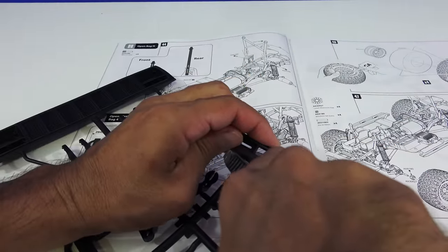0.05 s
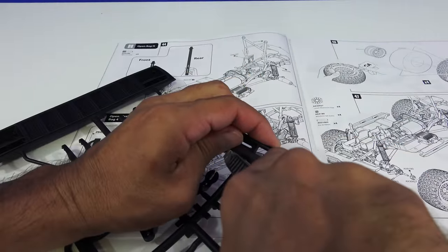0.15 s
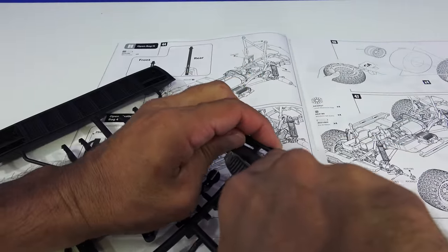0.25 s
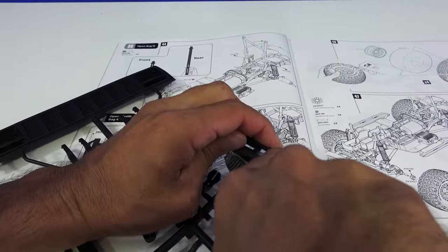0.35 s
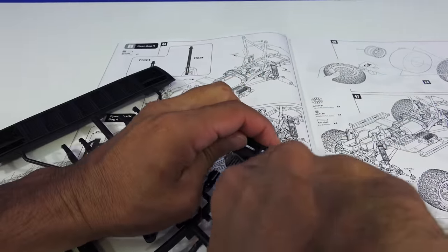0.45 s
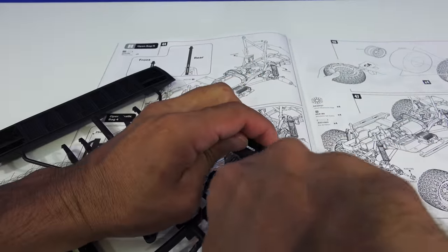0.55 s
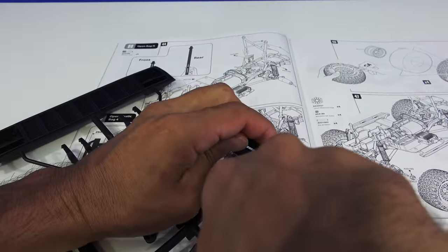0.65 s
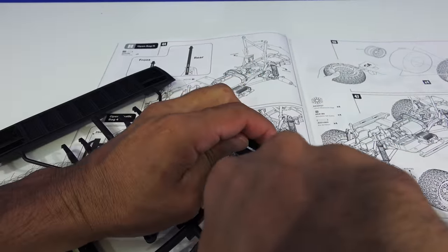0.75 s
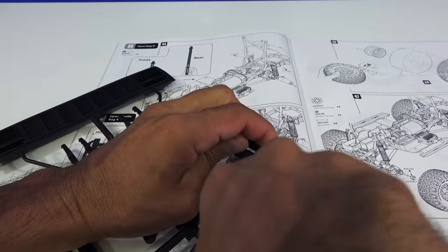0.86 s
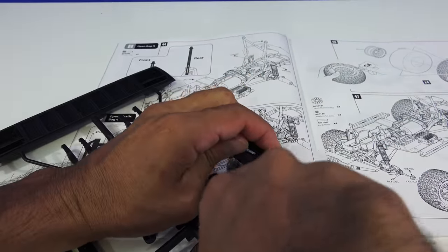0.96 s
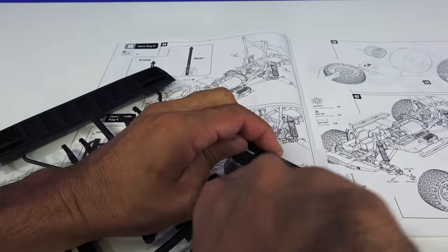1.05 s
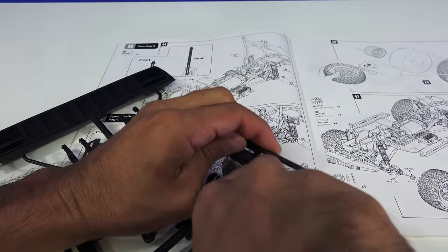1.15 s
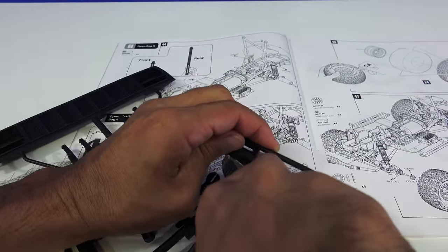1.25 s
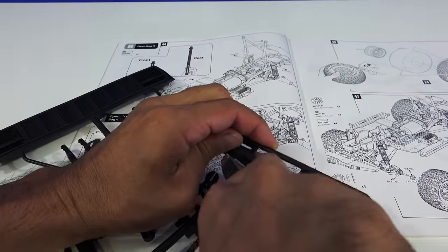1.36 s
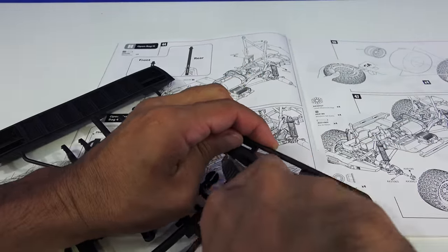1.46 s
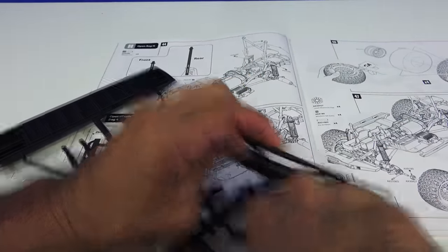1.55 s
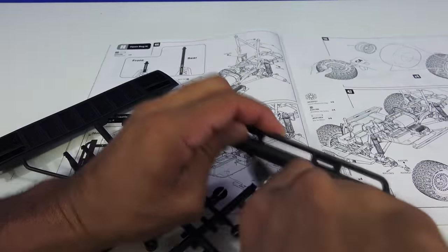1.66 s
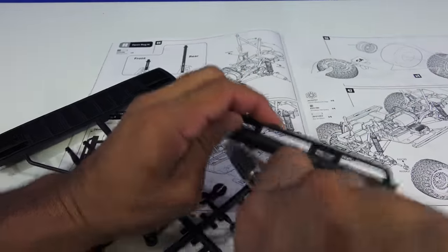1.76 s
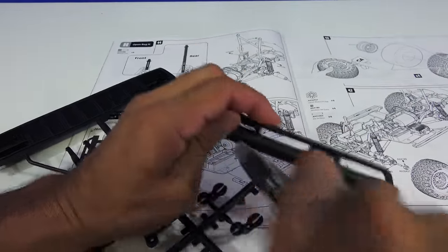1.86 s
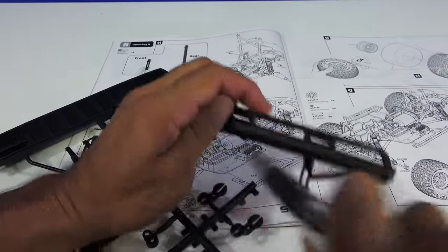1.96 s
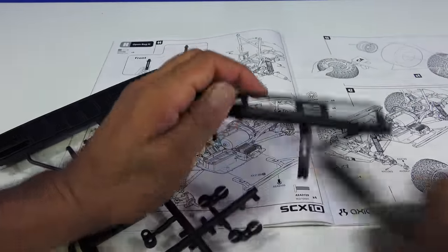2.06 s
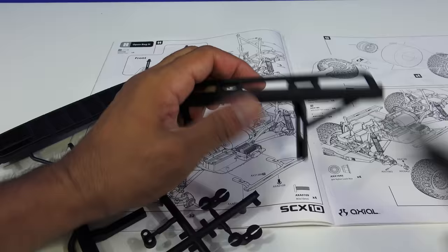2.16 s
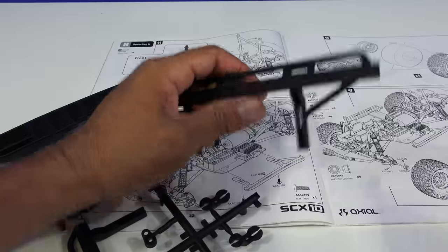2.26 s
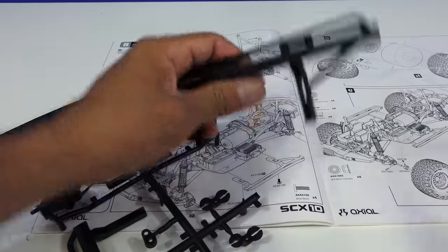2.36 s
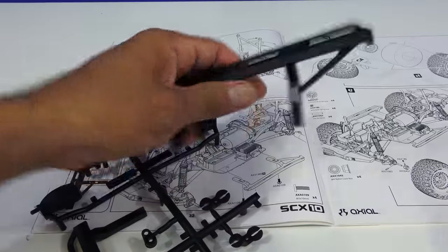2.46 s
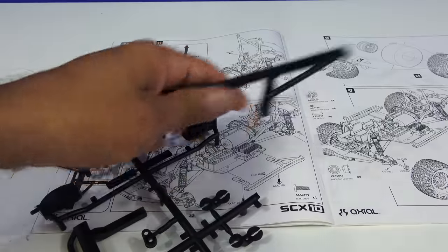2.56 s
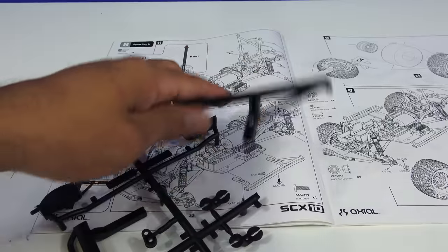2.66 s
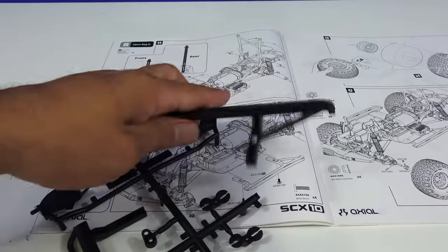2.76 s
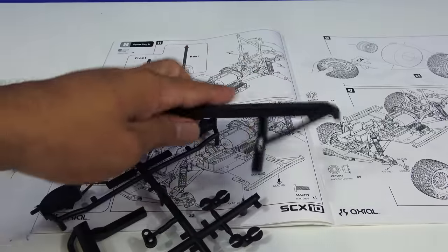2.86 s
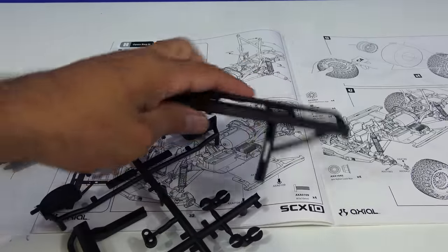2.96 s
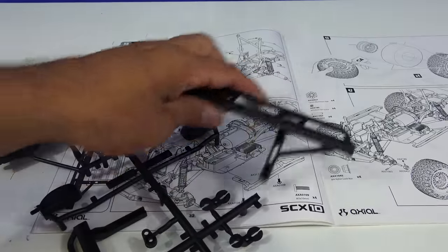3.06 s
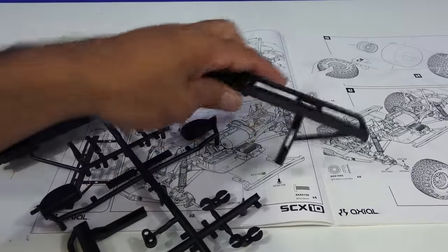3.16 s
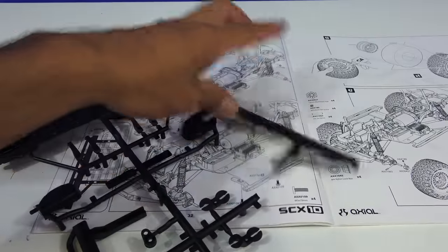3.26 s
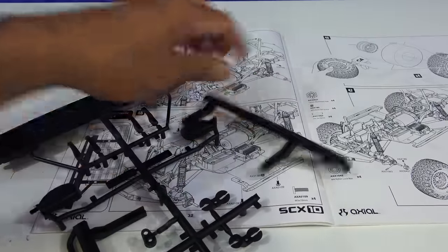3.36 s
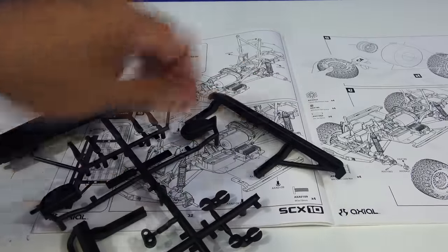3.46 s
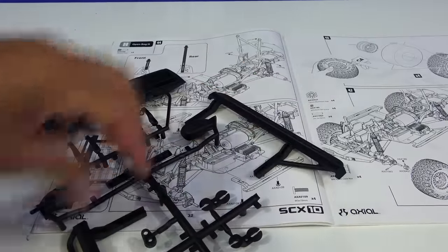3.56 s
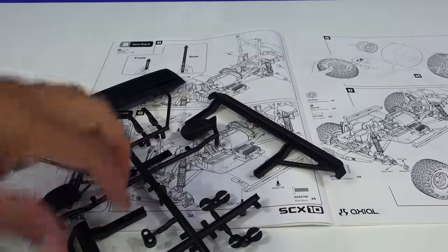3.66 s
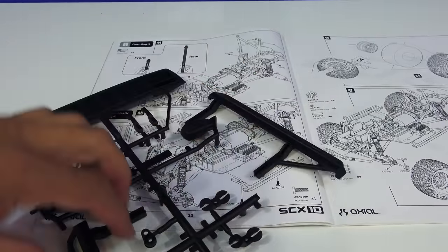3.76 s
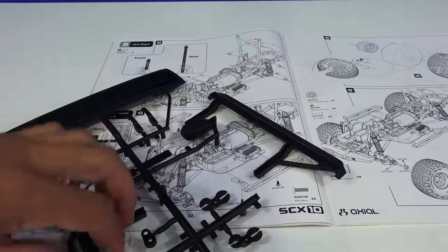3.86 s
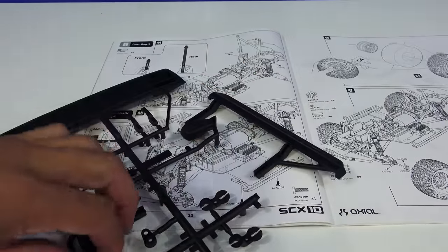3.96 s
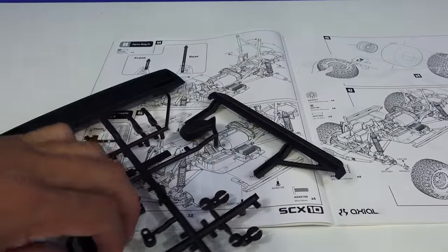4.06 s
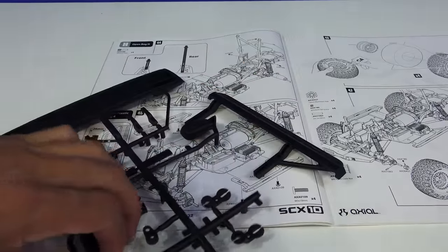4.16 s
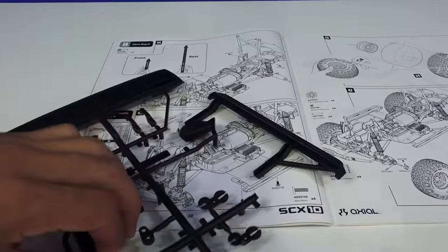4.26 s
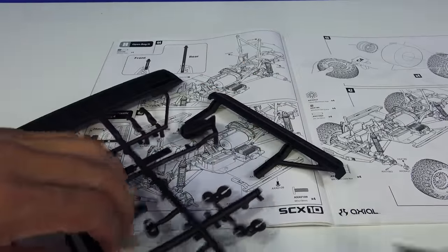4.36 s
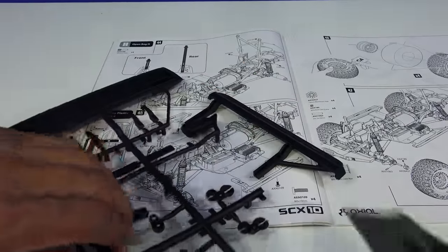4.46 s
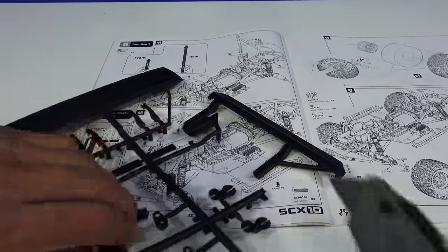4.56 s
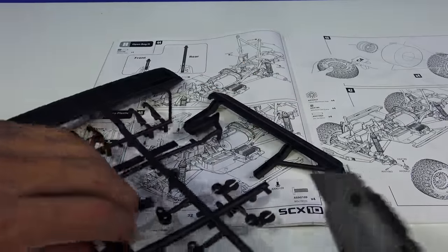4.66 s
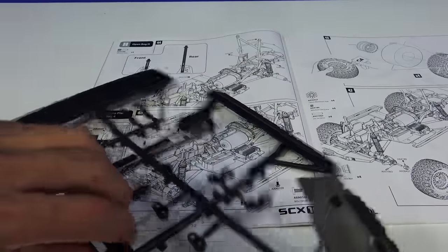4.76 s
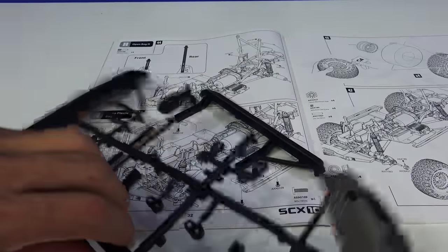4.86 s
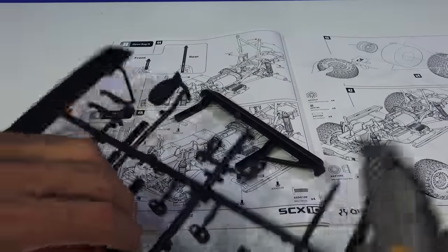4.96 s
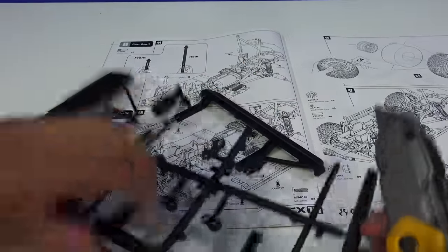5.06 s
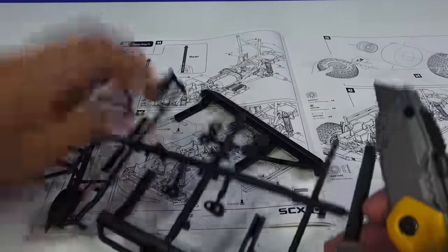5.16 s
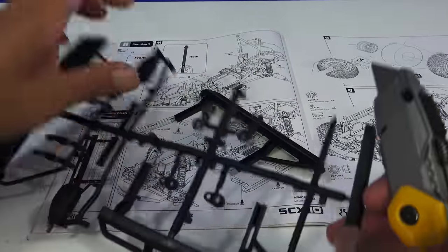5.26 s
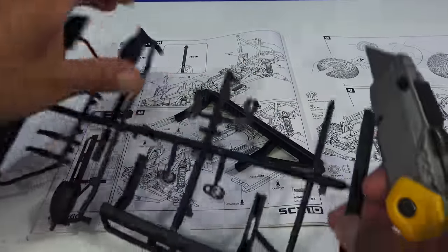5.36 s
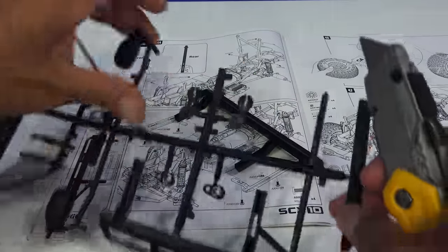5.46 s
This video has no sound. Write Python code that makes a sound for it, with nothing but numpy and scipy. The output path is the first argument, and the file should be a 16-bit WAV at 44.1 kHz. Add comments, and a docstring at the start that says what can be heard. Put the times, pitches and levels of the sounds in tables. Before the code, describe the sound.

A hard plastic part cracks free of its frame under a knife, rattling sharply, then the frame is swung round with two loud hollow knocks.

```python
"""On a table in a small room, a hard plastic part is cut from its frame with a knife.
The blade ticks and skids, the stub snaps and the frame chatters; the part is laid down, then the
frame is swung round and makes two loud knocks. Cracks and knocks are noise bursts with uneven
rebounds, plus ringing tones. Hand movements bring swells of rumble, rubbing and rustle made of
tiny random slips. Faint thin tones that come and go, whistles and steady room noise lie beneath."""
import sys
import numpy as np
from scipy import signal
from scipy.fft import rfft, irfft
from scipy.io import wavfile
from scipy.ndimage import uniform_filter1d

SR = 44100
rng = np.random.default_rng(int(sys.argv[2]) if len(sys.argv) > 2 else 0)


def generate_wav(sig):
    """Save sig (samples, or channels by samples) to the path in sys.argv[1] as 16-bit PCM at SR."""
    pcm = np.round(np.clip(np.atleast_2d(sig).T, -1, 1) * 32767).astype(np.int16)
    wavfile.write(sys.argv[1], SR, pcm)


N = 242991  # length of the scene in samples
TIME = np.arange(N) / SR  # seconds

# Levels in the tables are relative: later steps filter and mix the sounds.
# Blows: (time [s], level [dB], brightness [dB per octave], chatter length [s])
# sharp cracks and clatter of hard plastic
SNAPS = [(.330, -43, 4, 0.19), (1.611, -35, -3, 0.33), (1.620, -25, -0.5, 0.041), (1.6235, -15, -1, 0.48),
         (1.655, -17.5, -0.5, .25), (1.774, -32.5, -3, 0.22), (1.797, -21.5, 2.5, .11),
         (1.870, -36.5, 3.5, 0.0834), (2.140, -43.5, 0, 0.22), (3.294, -44.5, 6.5, 0.27),
         (3.338, -31, 2.5, .04), (3.3445, -21, 1, .15), (3.383, -30, -2, 0.26), (3.428, -39, 2.5, .04),
         (3.468, -34, -1, 0.26)]
# dull knocks of the frame on the paper-covered table
KNOCKS = [(1.639, -18, -12, 0.2), (1.695, -15, -4, 0.13), (1.704, -28, 2, .15), (2.170, -43, -2.5, 0.2),
          (2.194, -42.5, -3, 0.17), (3.382, -30.5, 0, .07), (3.971, -44, 8, 0.29), (4.9103, -14, 3, 0.27),
          (4.936, -11.5, 3.5, 0.19), (5.089, -37, -2, 0.12), (5.113, -34, 2.5, 0.21),
          (5.149, -12, -3, 0.16), (5.173, -23.5, -3.5, 0.17)]
# the blade skidding through the stub
SKIDS = [(1.611, -34, -6.5, 0.19), (1.6235, -20.5, -3.5, 0.45), (1.641, -21, -1, 0.3),
         (1.774, -32.5, 4.5, 0.1)]
# short creaks of plastic under strain
CREAKS = [(.116, -56, -2.5, 0.17), (.146, -50.5, -4, 0.027), (.215, -56.5, -3, 0.9),
          (1.082, -57.5, -2, 0.28), (1.117, -49, 5.5, 0.36), (1.171, -45, 4.5, 0.11),
          (1.394, -55, -5.5, 0.27), (3.957, -44.5, 5.5, 0.125), (4.808, -55, -7, 0.6)]
# pushes that set the table top moving: (time [s], level [dB], hardness [dB per octave])
THUDS = [(.592, -38, -36), (1.073, -45.5, -23), (1.134, -41.5, -42), (1.648, -14.5, -4.5),
         (1.697, -24.5, 9.5), (1.813, -37, -22), (3.347, -24, -1.5), (3.902, -39.5, -27.5),
         (3.958, -30.5, -38), (4.275, -49, -27.5), (4.91, -34, 3.5), (5.15, -24, 6.5)]

# Ringing tones, or modes: (pitch [Hz], level [dB], time to fall by 60 dB [s])
# the plastic
PLASTIC_MODES = [(630, -8, .12), (1380, 0, .12), (1530, -2, .1), (1730, -3, .13), (2200, -7, .12),
                 (2850, -9, .12), (3370, -4, .16), (3990, -2, .18), (4390, -7, .08), (4790, -5, .14),
                 (5080, -8, .1), (6210, -7, .14), (6910, -10, .12), (8150, -14, .12)]
# the whole frame
FRAME_MODES = [(407, 0, .28), (441, -2, .3), (598, -1, .22), (645, -1, .25), (775, -2, .15), (890, -3, .18),
               (1015, -3, .16), (1090, -3, .18), (1211, 3, .17), (1335, 3, .2), (1530, -1, .15),
               (1720, -9, .2), (1978, -6, .16)]
# the table top
TABLE_MODES = [(71, 0, .17), (86, -6, .13), (110, -6, .08), (138, 0, .17), (178, -7, .09), (240, -13, .07)]
# the blade
BLADE_MODES = [(4000, -4, .08), (4140, 5, 0.13), (4320, -3.5, 0.056), (4800, -1, 0.11)]
# faint thin tones: a longer fall time makes a narrower tone
THIN_TONES = [(2160, -7, .1), (2560, -9, .1), (2940, -7, .1), (3935, -2, .12), (4740, 1, .07),
              (5090, -8, .1), (5980, -9, .06)]

# Colours, the balance of low and high in each noise: (frequency [Hz], level [dB per Hz])
# snapping plastic
SNAP_COLOUR = [(30, -25.5), (100, -14.5), (250, -6), (700, -4.5), (1500, -1.5), (2200, 0), (2900, -4.5),
               (4100, -8.5), (5500, -7), (7500, -11), (10000, -13), (15500, -16.5)]
# knocking frame
KNOCK_COLOUR = [(30, -36), (70, -14), (140, -16), (240, -4.5), (400, 0), (800, 2.5), (1350, 1.5),
                (1900, -6), (2400, -14), (3500, -22.5), (5000, -29), (7500, -37.5), (9500, -58.5),
                (15000, -60)]
# skidding blade
BLADE_COLOUR = [(500, -28.5), (2800, -15), (3700, -0.5), (4500, -8), (5400, -12), (7000, -9.5),
                (10000, -19.5), (15500, -29)]
# creaking plastic
CREAK_COLOUR = [(100, -29.5), (400, -15), (650, -10.5), (1100, -9.5), (1500, -2.5), (2300, 0.5),
                (3200, 5.5), (4200, -23.5), (4900, -10.5), (6300, -4.5), (8000, -21.5), (10000, -33.5),
                (15000, -49)]
# frame rubbing on paper
RUB_COLOUR = [(100, -15.5), (300, 0.5), (430, -7.5), (620, 0.5), (900, -5.5), (1300, -13.5), (2000, -9.5),
              (3500, -25), (12000, -56)]
# fingers on plastic
RUSTLE_COLOUR = [(500, -27.5), (1300, -9.5), (1800, 5.5), (2500, 4), (3300, 3), (4300, -14), (5000, -5),
                 (6500, -9.5), (9000, -14), (15000, -29)]
# arms on the table
RUMBLE_COLOUR = [(15, -25.5), (30, -16), (45, -3.5), (75, 25.5), (110, -29.5), (170, -29.5), (300, -32.5),
                 (1000, -63.5)]
# the still room
AIR_COLOUR = [(25, -12.5), (70, 6), (150, -25.5), (290, 3), (430, -27), (600, -23), (900, -18.5),
              (1800, -23), (3000, -23.5), (6000, -21), (10000, -32), (15000, -41.5)]

# movements of the hands: (start [s], length [s], arms on the table [dB],
# frame rubbing on paper [dB], fingers on plastic [dB])
# In turn: the blade is pressed in, the grip shifts, the blade is pressed again, it bites deeper,
# the part breaks free, is drawn out, lowered and laid down, the fingers let go, the hand takes
# hold of the frame, settles its grip, the frame is swung round and slides to rest.
MOVES = [(-.03, .55, -65.5, -69.5, -65.5), (0.551, .33, -65.5, -74, -69), (1.041, .3, -70, -68, -62.5),
         (1.384, .22, -63, -65.5, -61), (1.605, 0.24, -39, -43.5, -39.5), (1.868, 0.45, -61, -54, -61),
         (2.978, 0.083, -78.5, -70, -80), (3.332, .14, -48, -54.5, -62), (3.5, 0.23, -63, -66, -65),
         (3.919, 0.29, -60, -59.5, -65), (4.22, 1, -70.5, -68.5, -95), (4.92, 0.27, -54, -39.5, -61.5),
         (5.168, 0.3, -48, -50.5, -84)]
# hands that only hold: (arms [dB], frame [dB], fingers [dB])
RESTING_DB = [-82.5, -75.5, -73]
# when the faint thin tones come and go: (start [s], length [s], level [dB])
THIN_TONE_SPELLS = [(0, 0.65, -75), (0.649, 0.16, -73.5), (1.194, 0.16, -77.5), (2.5, 0.344, -83),
                    (2.989, 0.2, -68), (3.96, 0.44, -71)]
# faint thin whistles: (time [s], length [s], start pitch [Hz], level [dB])
WHISTLES = [(1.234, 0.15, 873, -60), (2.457, 0.19, 2920, -65.5), (2.535, 0.3, 7000, -79),
            (2.716, 0.62, 2020, -66), (3.039, 0.24, 1943, -58.5), (3.057, 0.24, 6750, -65.5),
            (3.533, 0.19, 6300, -60), (3.794, 0.35, 6180, -60.5), (4.224, 0.16, 6590, -63.5),
            (4.632, 0.41, 6090, -57.5)]

# how long the room tail lasts: (frequency [Hz], time to fall by 60 dB [s])
ROOM_T60 = [(100, 0.33), (300, 0.79), (700, 0.21), (1800, 1), (5000, 0.93), (13000, 0.74)]
# how much sound goes into the room tail: (frequency [Hz], level [dB])
ROOM_SEND = [(100, -10), (400, -26), (1500, -21.5), (5000, -17.5), (13000, -16.5)]
# gain of the difference between the two channels: (frequency [Hz], gain [dB])
SIDE_GAIN = [(60, -28.5), (300, -17), (2000, -19), (4500, -23), (6500, -10.5), (8000, 0.5), (10000, -7.5),
             (13000, -10)]
# how much louder the left channel is than the right: (frequency [Hz], left minus right [dB])
LEFT_LEAN = [(60, 11), (130, 1.5), (250, 9.5), (500, -5), (1000, 0.76), (3000, 2.5), (8000, 0.5),
             (13000, 0)]
# where the noise suppressor starts to turn down: (frequency [Hz], threshold [dB])
GATE = [(60, -53), (180, -52), (350, -52.5), (1100, -58), (2200, -60.5), (5000, -69), (8000, -73),
        (11000, -79.5), (15000, -74)]

MOVE_RISE_S, MOVE_SAG_DB_PER_S, MOVE_RELEASE_S = .03, 8, .015
REBOUND_GAP_S, REBOUND_SPREAD_DB = .011, 3
TOUCH_S, TOUCH_DB = .0065, -14.5  # how much earlier, and at what level change, an edge lands
WHISTLE_SAG_PER_S, WHISTLE_WIDTH = .24, .06  # shares of the start pitch
DRAG_START_S, DRAG_END_S = 4.99, 5.135
EDGE_HZ = 15950  # upper band limit


def amp(db):
    """Turns decibels into a gain."""
    return 10 ** (np.asarray(db) / 20)


def unit(x):
    """Scales a sound to an average strength (rms) of 1."""
    return x / np.sqrt(np.mean(x ** 2) + 1e-20)


def read(points, hz):
    """Reads a table between its points, on a log-frequency axis."""
    f, value = np.transpose(points)
    return np.interp(np.log(hz + 1), np.log(f + 1), value)


def freqs(x):
    """Lists the frequencies in the spectrum of x."""
    return np.fft.rfftfreq(x.shape[-1], 1 / SR)


def shaped(x, db):
    """Filters x by a gain in dB for each frequency."""
    return irfft(rfft(x) * amp(db), x.shape[-1])


def add(mix, s, sound):
    """Adds a sound to the mix at time s."""
    part = mix[:, max(round(s * SR), 0):][:, :sound.shape[-1]]
    part += sound[:, :part.shape[-1]]


def air(db=-75):
    """The faint steady sound of the room: coloured noise."""
    hiss = rng.standard_normal((2, N))
    return amp(db) * unit(shaped(hiss, read(AIR_COLOUR, freqs(hiss))))


def swell(s, length):
    """A gain that builds up, eases off while it lasts, and dies away."""
    t = np.maximum(TIME - s, 0)
    rise = np.minimum(t / MOVE_RISE_S, 1)
    release = np.exp(-np.maximum(t - length, 0) / MOVE_RELEASE_S)
    return rise * amp(-MOVE_SAG_DB_PER_S * t) * release


def effort():
    """Gains of arms, frame and fingers: the movements on top of the resting level."""
    power = sum((amp(db)[:, None] * swell(s, length)) ** 2 for s, length, *db in MOVES)
    return np.sqrt(power + amp(RESTING_DB)[:, None] ** 2)


def friction(colour, per_s, spread_db, patchy_db):
    """Tiny slips of uneven size; the colour wanders at random in patches of time and frequency."""
    happens = rng.random(N) < per_s / SR
    size = amp(spread_db * np.minimum(rng.exponential(1, N), 4)) * happens
    hz, _, z = signal.stft(size * rng.standard_normal((2, N)), SR, nperseg=1024)
    patches = rng.standard_normal(z.shape[1:])
    patches = uniform_filter1d(patches, size=5, axis=0)  # smooth over frequency
    patches = uniform_filter1d(patches, size=9, axis=1)  # smooth over time
    z = z * amp(read(colour, hz)[:, None] + patchy_db * unit(patches))
    return unit(signal.istft(z, SR, nperseg=1024)[1][:, :N])


def sing(x, modes, body_db, width_hz):
    """Rubbing keeps the modes of a body ringing."""
    body = sum(amp(db) / (1 + 2j * (freqs(x) - hz) / width_hz) for hz, db, _ in modes)
    ringing_body = unit(irfft(rfft(x) * body, N))
    return unit(x + amp(body_db) * ringing_body)


def handling(rumble_db=-0.5, rub_db=0.5, rustle_db=-2.5):
    """Arms shift on the table, the frame slides on paper, fingers rub and make the plastic sing."""
    arms, frame, fingers = effort()
    rumble = friction(RUMBLE_COLOUR, per_s=720, spread_db=2.8, patchy_db=4)
    rub = friction(RUB_COLOUR, per_s=1800, spread_db=2, patchy_db=6)
    rub = sing(rub, FRAME_MODES, body_db=1.5, width_hz=34)
    rustle = friction(RUSTLE_COLOUR, per_s=1200, spread_db=1.5, patchy_db=7)
    rustle = sing(rustle, PLASTIC_MODES, body_db=-2, width_hz=45)
    return amp(rumble_db) * arms * rumble + amp(rub_db) * frame * rub + amp(rustle_db) * fingers * rustle


def thin_tones():
    """Noise passed through narrow resonances makes a few faint thin tones that come and go."""
    noise = rng.standard_normal((2, N))
    hz = freqs(noise)
    peaks = sum(amp(db) / (1 + (t60 * (hz - f) / np.log(10)) ** 2) for f, db, t60 in THIN_TONES)
    level = sum(amp(db) * swell(s, length) for s, length, db in THIN_TONE_SPELLS)
    return unit(irfft(rfft(noise) * peaks, N)) * level


def resonances(modes, hz, width_hz):
    """Gain in dB of a body with these modes: their peaks against a ten times wider blur."""
    def peaks(width):
        return sum(amp(db) ** 2 / (1 + (2 * (hz - f) / width) ** 2) for f, db, _ in modes)
    power = peaks(width_hz)
    smooth = peaks(10 * width_hz) / 10
    return 10 * np.log10((power + smooth / 2) / (smooth + smooth / 2))


def ring(modes, t, tilt_db, spread_db):
    """Fading modes; each blow lands elsewhere and shares its energy differently among them."""
    hz, db, t60 = np.transpose(modes)[:, :, None]
    uneven_db = spread_db * rng.standard_normal((2, len(modes), 1))
    size = amp(db + tilt_db * np.log2(hz) + uneven_db)
    size /= np.sqrt((size ** 2).sum(1, keepdims=True) / 2)  # same total strength for each blow
    tones = np.sin(2 * np.pi * (hz * t + rng.random(size.shape)))
    return (size * amp(-60 * t / t60) * tones).sum(1)


def chatter(t, length_s, rebound_db, t60, count=30):
    """Envelope of one contact and its uneven rebounds, which weaken by about 60 dB over length_s."""
    at = np.cumsum(REBOUND_GAP_S * (.5 + rng.random(count)))
    size = amp(rebound_db - 60 * at / length_s + REBOUND_SPREAD_DB * rng.standard_normal(count))
    energy = np.bincount(np.round(at * SR).astype(int), size ** 2, len(t))[:len(t)]
    energy = energy + (t == 0)  # the first contact
    keep = amp(-60 / (t60 * SR)) ** 2  # share of energy left after one sample
    return np.sqrt(signal.lfilter([1], [1, -keep], energy))


def blows(rows, colour, modes, ring_db, crack_db, crack_s, rise_s, width_hz, soft_db, t60, rebound_db):
    """Each blow: a brief crack, a chattering burst of crowded, damped modes, and a few that ring on."""
    out, t = np.zeros((2, N)), np.arange(2 ** 14) / SR
    hz = freqs(t)
    body_db = read(colour, hz) + resonances(modes, hz, width_hz)
    octaves_above_7k = np.log2(np.maximum(hz / 7000, 1))
    usual_s = np.median(np.transpose(rows)[-1])
    hardest_db = max(row[1] for row in rows)
    lag = np.exp(-2 / (rise_s * SR))
    for s, db, tilt_db, chatter_s in rows:
        gentle = (hardest_db - db) / 20
        # soft_db changes the top treble of gentle blows
        tone_db = body_db + tilt_db * np.log2(np.maximum(hz, 250)) + soft_db * gentle * octaves_above_7k
        crowd = unit(shaped(rng.standard_normal((2, len(t))), tone_db))
        crack = amp(crack_db) * np.exp(-t / crack_s)
        envelope = chatter(t, chatter_s, rebound_db, t60) + crack
        # every contact takes about rise_s to build
        envelope = signal.lfilter([(1 - lag) ** 2], np.poly([lag, lag]), envelope)
        free = min(chatter_s / usual_s, 1)  # a tight grip weakens the long modes too
        tones = ring(modes, t, tilt_db, spread_db=7.5) * (1 - np.exp(-t / rise_s)) ** 2
        add(out, s, amp(db) * (crowd * envelope + free * amp(ring_db) * tones))
    return out


def creaks():
    """Strained plastic gives in small jerks, each a short burst coloured by its modes."""
    return blows(CREAKS, CREAK_COLOUR, PLASTIC_MODES, ring_db=-3, crack_db=-13, crack_s=.002,
                 rise_s=.0004, width_hz=140, soft_db=1.5, t60=.041, rebound_db=1.5)


def snaps():
    """Hard plastic breaks or clatters: a sharp crack, then chatter and ringing."""
    return blows(SNAPS, SNAP_COLOUR, PLASTIC_MODES, ring_db=-12, crack_db=-4, crack_s=.00046,
                 rise_s=.00025, width_hz=130, soft_db=-7, t60=.047, rebound_db=-2.5)


def table(rise_s=0.01, low_cut_hz=58):
    """The table top answers a push with its low modes; little sounds below them."""
    out, t = np.zeros((2, N)), np.arange(SR // 2) / SR
    hz, db, t60 = np.transpose(TABLE_MODES)[:, :, None]
    for s, level, tilt_db in THUDS:
        size = amp(db + tilt_db * np.log2(hz / hz[0]))
        sound = (size * amp(-60 * t / t60) * np.sin(2 * np.pi * hz * t)).sum(0)
        add(out, s, amp(level) * sound[None] * (1 - np.exp(-t / rise_s)))
    return signal.sosfilt(signal.butter(2, low_cut_hz, "high", fs=SR, output="sos"), out)


def whistles(rise_share=0.08):
    """Narrow, fuzzy bands of sound that swell quickly and fade as they sag in pitch."""
    out, t = np.zeros((2, N)), np.arange(SR // 2) / SR  # at most half a second each
    for s, length, hz, db in WHISTLES:
        fuzz = rng.standard_normal((2, len(t)))
        half_width_hz = WHISTLE_WIDTH * hz / 2
        fuzz = unit(shaped(fuzz, -20 * np.log10(1 + (freqs(fuzz) / half_width_hz) ** 2)))
        progress = np.minimum(t / length, 1)
        turns = np.cumsum(hz * (1 - WHISTLE_SAG_PER_S * t)) / SR
        envelope = np.minimum(progress / rise_share, 1) * np.sqrt(1 - progress)
        add(out, s, amp(db) * envelope * fuzz * np.sin(2 * np.pi * turns))
    return out


def skids():
    """The blade skids through the stub: chattering contacts coloured by the modes of the blade."""
    return blows(SKIDS, BLADE_COLOUR, BLADE_MODES, ring_db=-16, crack_db=-11, crack_s=.00049,
                 rise_s=.0004, width_hz=110, soft_db=-11, t60=.095, rebound_db=-4.5)


def landings():
    """Every knock, and the light touch of one edge of the frame just before it."""
    touches = [(s - TOUCH_S, db + TOUCH_DB, tilt_db, TOUCH_S) for s, db, tilt_db, _ in KNOCKS]
    return KNOCKS + touches


def knocks():
    """The frame lands on the table and rebounds, sounding its own modes."""
    return blows(landings(), KNOCK_COLOUR, FRAME_MODES, ring_db=-11.5, crack_db=-23, crack_s=.00049,
                 rise_s=.0004, width_hz=68, soft_db=-5, t60=.055, rebound_db=-2)


def drag(start_hz=445, end_hz=405, width_hz=30, db=-39):
    """Swung across the paper, the frame judders near its lowest mode: a tone of shaky loudness."""
    t = np.arange(SR // 4) / SR
    progress = np.minimum(t / (DRAG_END_S - DRAG_START_S), 1)
    shake = rng.standard_normal((2, len(t)))
    shake = unit(shaped(shake, -20 * np.log10(1 + (freqs(shake) / width_hz) ** 2)))
    judder = 1 + .5 * shake
    turns = np.cumsum(start_hz + (end_hz - start_hz) * progress) / SR
    envelope = np.sqrt(abs(np.sin(np.pi * progress)))
    out = np.zeros((2, N))
    add(out, DRAG_START_S, amp(db) * judder * envelope * np.sin(2 * np.pi * turns))
    return out


def room(x, build_s=0.015):
    """A weak diffuse tail of fading noise, each band dying at its own speed."""
    hz, t, z = signal.stft(rng.standard_normal((2, SR)), SR, nperseg=256)
    t60 = read(ROOM_T60, hz)[:, None]
    even_energy = np.sqrt(2 * np.log(1000) / (t60 * SR))  # long and short tails weigh the same
    z = z * amp(read(ROOM_SEND, hz)[:, None] - 60 * t / t60) * even_energy
    tail = signal.istft(z, SR, nperseg=256)[1][:, :SR]
    tail = tail * (1 - np.exp(-TIME[:SR] / build_s))
    return signal.fftconvolve(x[:1], tail, axes=1)[:, :N]


def ports(x):
    """Two close microphone ports share one common sound; bass leans left, most difference near 8 kHz."""
    hz = freqs(x)
    common, side = x[0], shaped(x[1], read(SIDE_GAIN, hz))
    lean_db = read(LEFT_LEAN, hz) / 2
    return np.array([shaped(common + side, lean_db), shaped(common - side, -lean_db)])


def scene():
    """Creaks, snaps, thuds, skids, knocks and drag in the room, over the quieter sounds."""
    hits = creaks() + snaps() + table() + skids() + knocks() + drag()
    quiet = air() + handling() + thin_tones() + whistles()
    return ports(hits + room(hits) + quiet)


def suppress(x, depth_db=-16):
    """Noise suppressor: turns down every band while its own power is under the threshold."""
    hz, _, z = signal.stft(x, SR, nperseg=2048)
    power = uniform_filter1d((abs(z) ** 2).mean(0), size=2, axis=1) * 2048 / 1.5
    over = (np.maximum(power, 0) / amp(read(GATE, hz))[:, None] ** 2) ** 2
    gain = np.maximum(over / (1 + over), amp(depth_db))
    return signal.istft(z * gain, SR, nperseg=2048)[1][:, :N]


def record(dry):
    """Noise suppression, then a low-pass filter that removes the highest treble."""
    low_pass = signal.firwin(511, EDGE_HZ, window=("kaiser", 9), fs=SR)
    return signal.oaconvolve(suppress(dry), low_pass[None], "same")


dry = scene()
out = record(dry)
generate_wav(out)
```